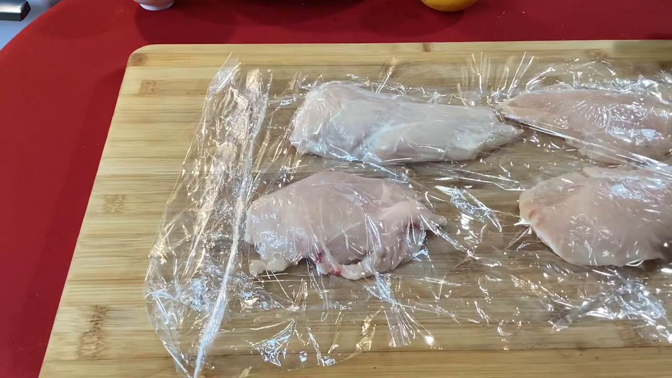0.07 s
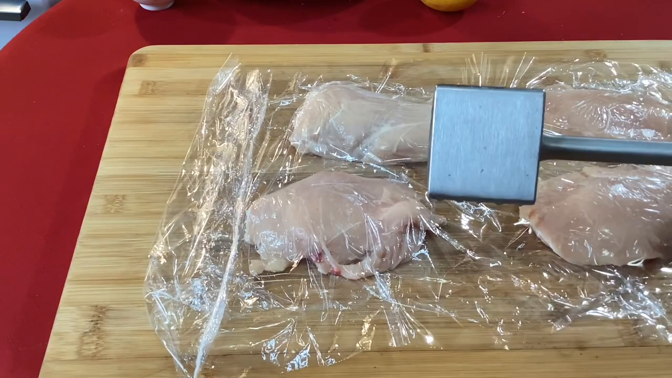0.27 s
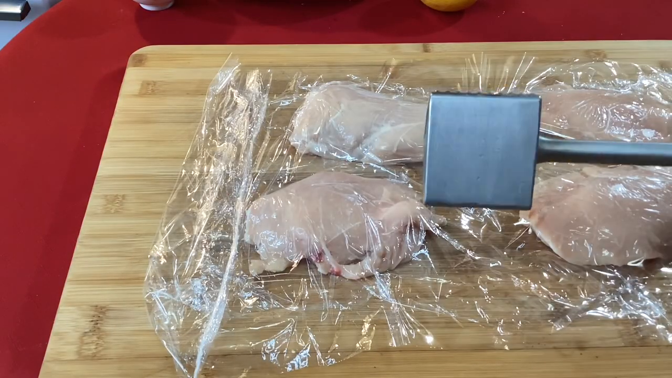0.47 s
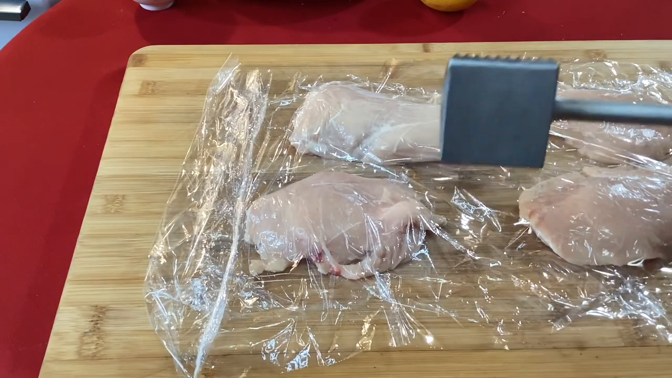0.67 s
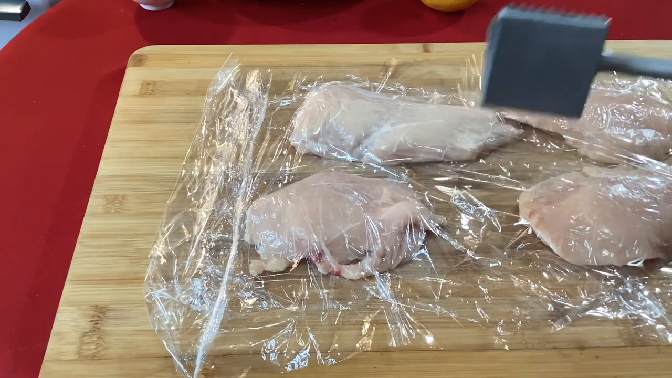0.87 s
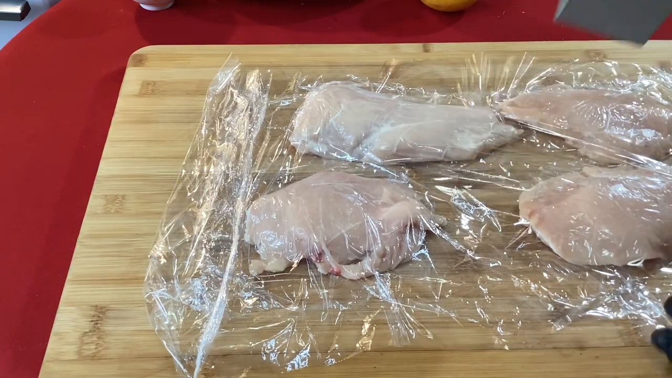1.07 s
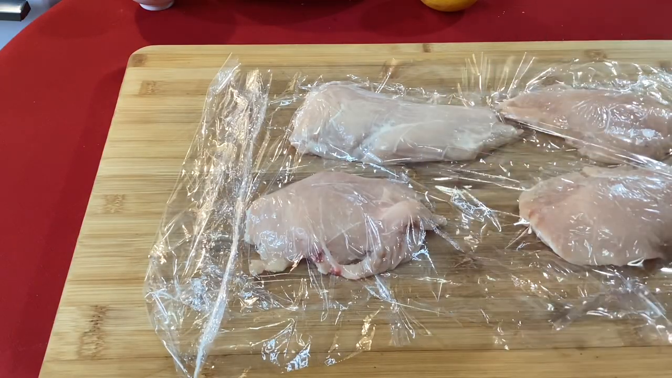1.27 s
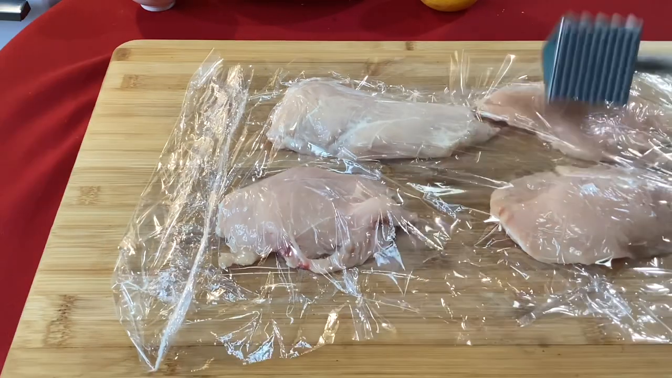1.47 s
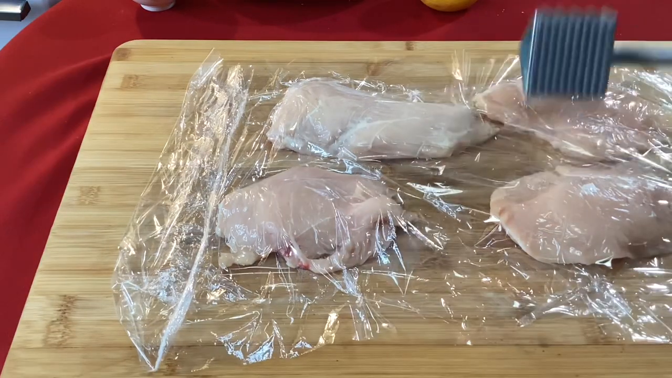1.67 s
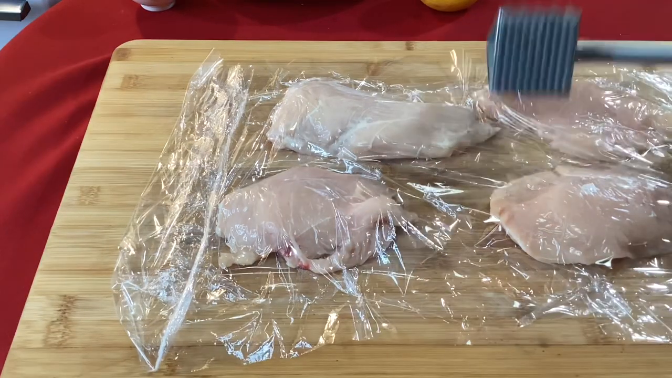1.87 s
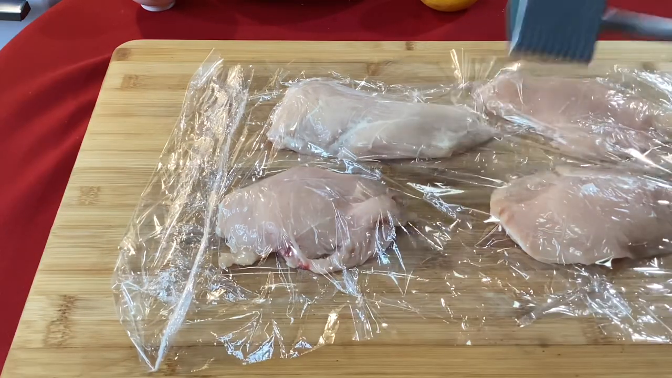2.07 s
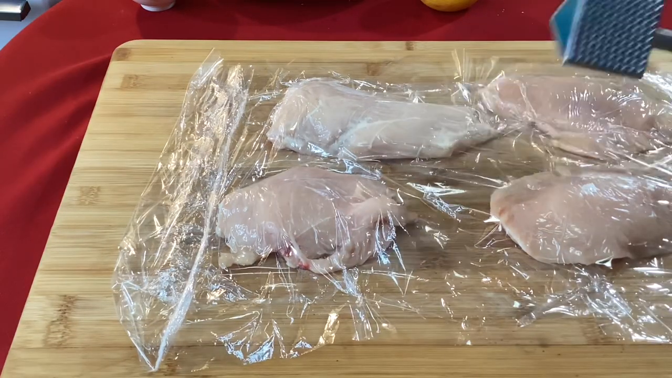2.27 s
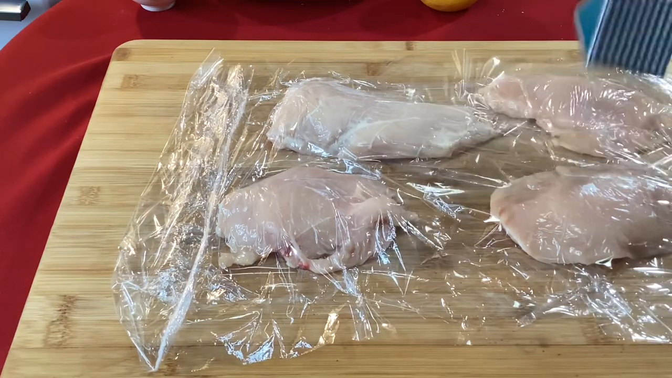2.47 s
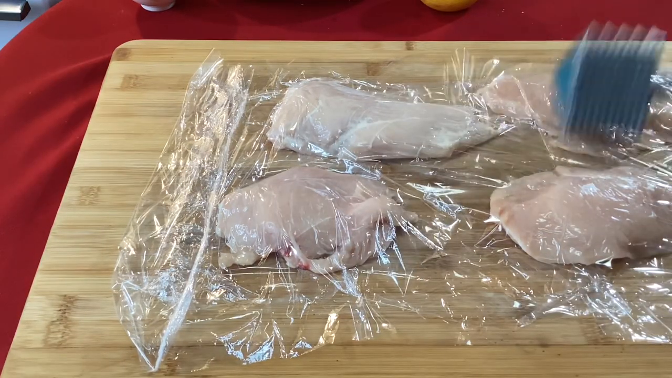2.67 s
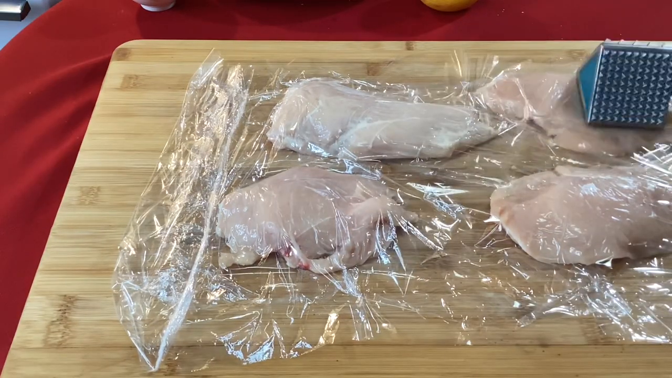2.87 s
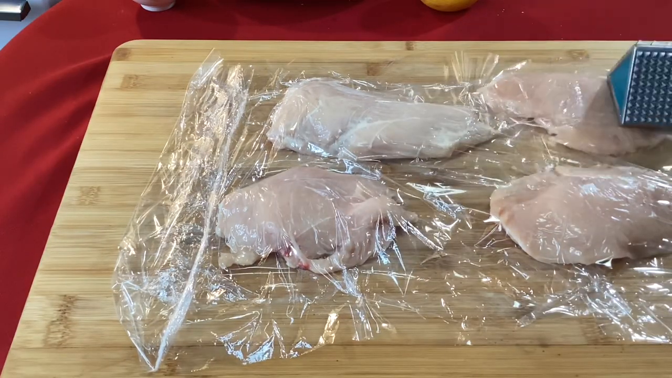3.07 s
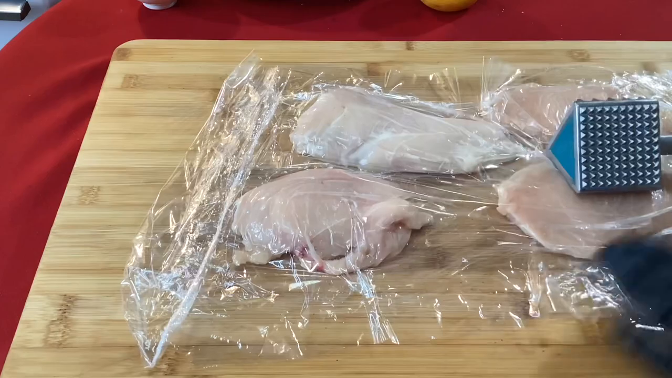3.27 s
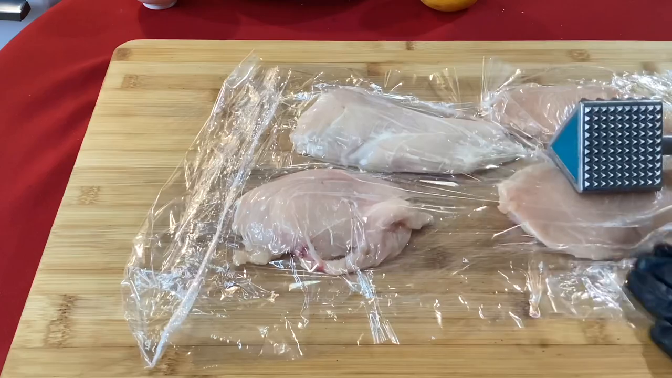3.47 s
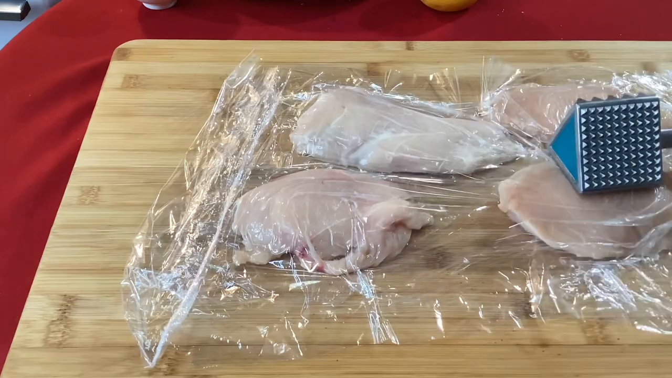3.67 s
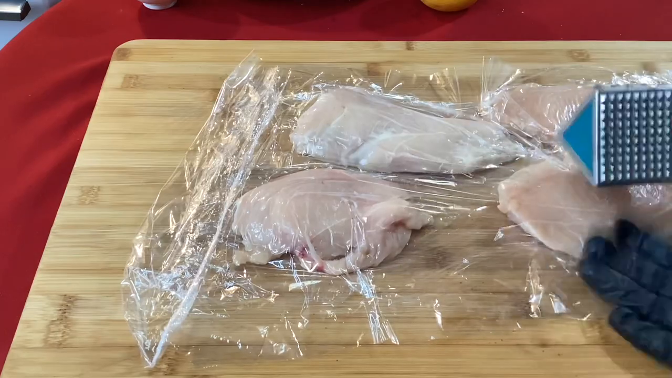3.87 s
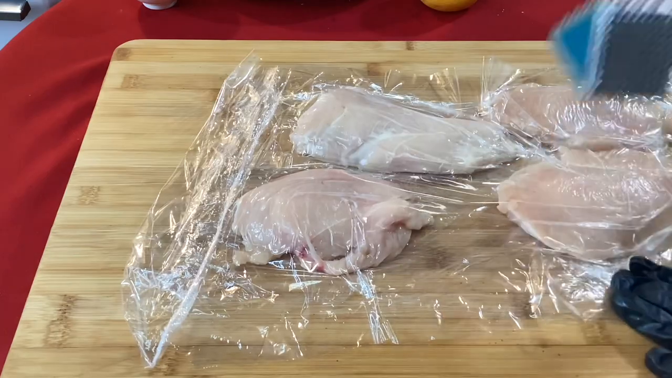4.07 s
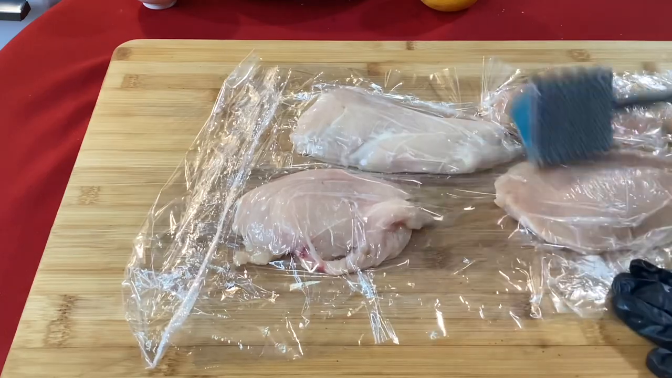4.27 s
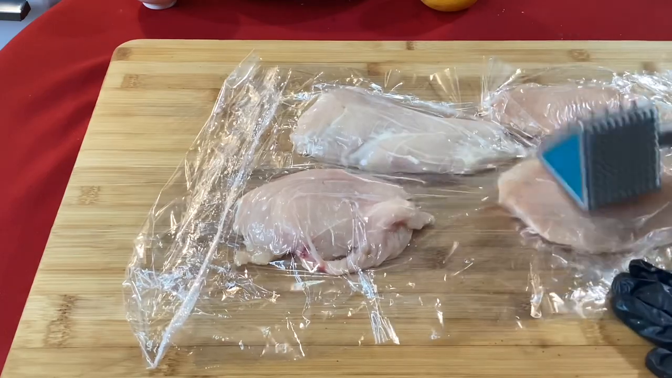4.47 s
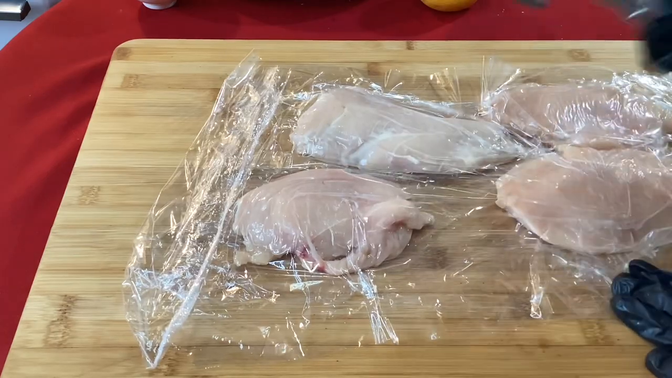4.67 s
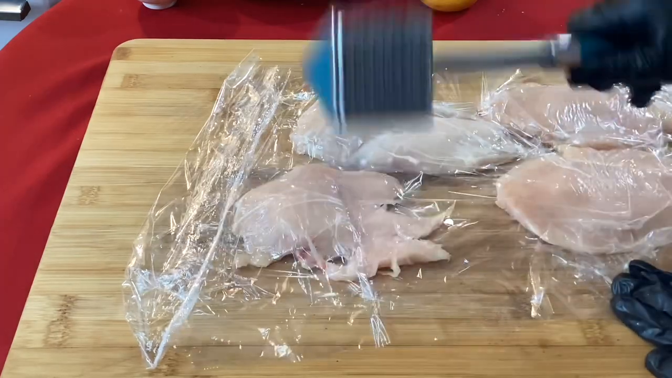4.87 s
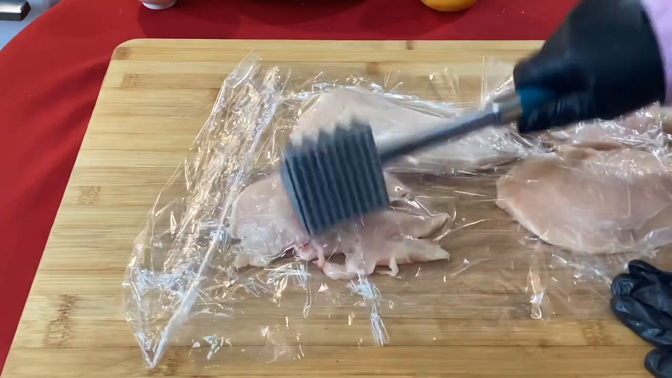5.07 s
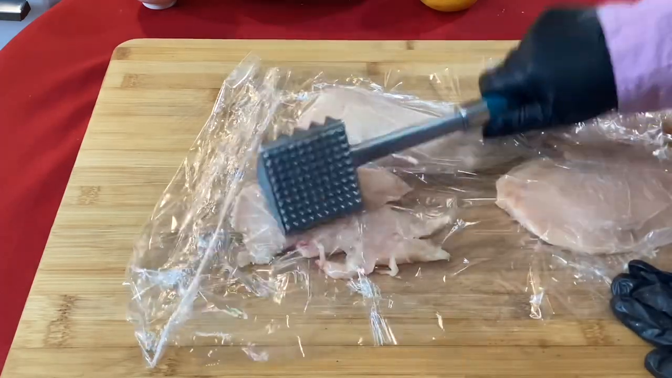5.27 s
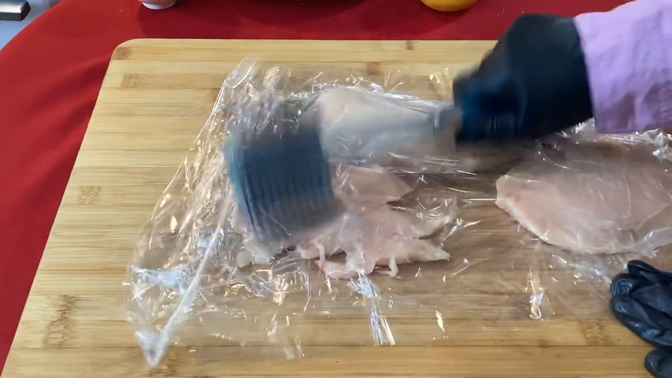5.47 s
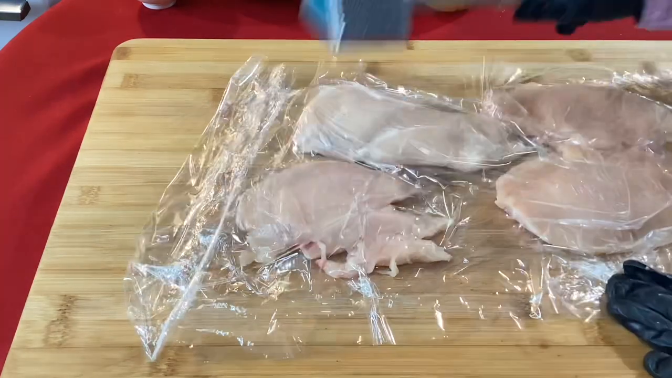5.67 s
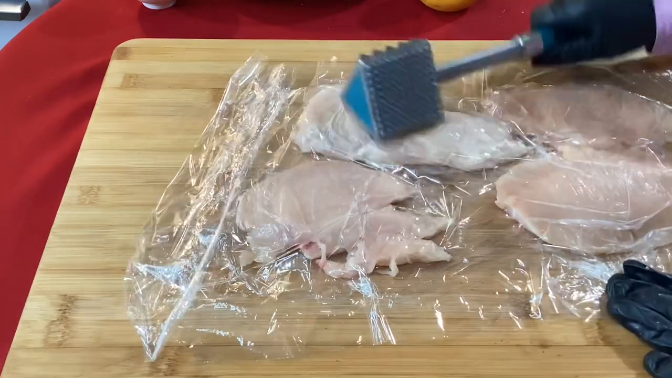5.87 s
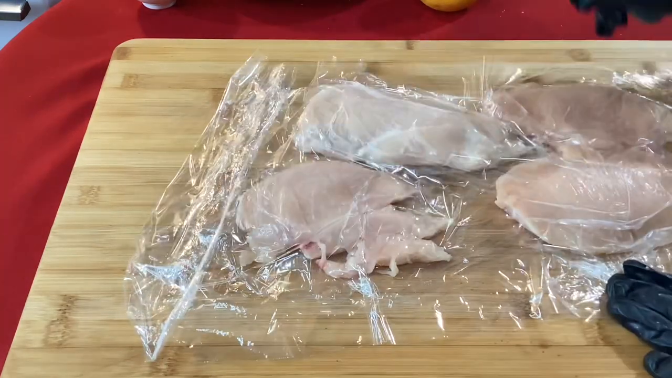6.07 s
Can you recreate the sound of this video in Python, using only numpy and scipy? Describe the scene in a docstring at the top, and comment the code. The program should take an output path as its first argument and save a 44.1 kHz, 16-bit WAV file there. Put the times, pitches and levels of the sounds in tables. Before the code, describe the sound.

Close up in a small kitchen, over a very faint low motor hum and microphone hiss. A tiny plastic crackle at the start gives way to near quiet, with a thin hiss and light rustling from about 0.6 s. At 1.4 s a mallet begins pounding meat through plastic wrap, ten blows about 0.18 s apart until 3.1 s, the early ones softer, the later ones brighter and harder. Each swells from crackle to a slap, with a short wooden knock and crinkly tail. From 3.2 to 3.85 s wrap and gloves rustle, then a very faint double touch near 3.9 s. Heavier, deeper blows land at 4.2, 4.5, 4.75, 5.0, 5.25 and 5.5 s, jolting a dish into faint clinks. After a brief dip at 5.7 s, a last slap at 5.83 s carries a sharp plastic snap; its tail fades into faint crackle by 6.1 s.

```python
"""A metal mallet pounds meat through plastic wrap on a wooden board in a small kitchen.
Each blow is noise crackling up to a slap with a noisy tail, over the ringing modes of the board.
A dish nearby sometimes clinks as a few decaying sines; wrap and gloves rustle as banded crackle, which
at the very end is the next blow beginning to swell. Behind lie the low overtones of a distant motor,
a narrow hiss that comes and goes and faint microphone hiss; the level dips briefly four times."""
import sys
import numpy as np
from scipy import signal
from scipy.fft import rfft, irfft, next_fast_len
from scipy.io import wavfile

SR = 44100
rng = np.random.default_rng(int(sys.argv[2]) if len(sys.argv) > 2 else 0)


def materialize(psi):
    """Save the field psi as 16-bit PCM at rate SR to the path in sys.argv[1].

    A 1-D psi becomes a single channel; in a 2-D psi each row is a channel.
    """
    bounded = np.clip(np.atleast_2d(psi).T, -1, 1)
    quanta = np.round(bounded * 32767).astype(np.int16)
    wavfile.write(sys.argv[1], SR, quanta)


def amplitude_ratio(level_db):
    """Convert a level in decibels to the matching linear amplitude (field) ratio."""
    exponent = np.asarray(level_db, float) / 20
    return 10 ** exponent


N = 270333
T = np.arange(N) / SR

# mallet on wrap: peak t/s, level/dB, tilt/dB per octave, air pocket f/Hz, its lift/dB,
# tail level relative to the slap/dB
MALLET_BLOWS = [(1.442, -43, 1, 1840, 5.5, -5), (1.629, -41.5, 2, 1400, 1.5, -5),
                (1.816, -43, 1.4, 1120, 6, -4), (1.998, -36.5, -0.4, 3600, 6.5, -7.5),
                (2.174, -34.5, -0.7, 3920, 14.5, -8), (2.343, -37, 0.5, 1380, 5, -8),
                (2.519, -31, -2, 2980, 9, -3), (2.694, -39, 0.4, 2920, 8.5, -4),
                (2.879, -33.5, 2.5, 4900, 9.5, -6), (3.059, -36, 0.4, 5750, 4.5, -9.5),
                (3.886, -51.5, 0.7, 4370, 7.5, -7.5), (3.923, -57.5, 0.5, 1320, 6, -1),
                (4.213, -33, 0.3, 3430, 3.5, -4), (4.474, -35.5, 2, 5200, -0.5, -5.5),
                (4.755, -34.5, -0.2, 4550, 8, -8), (5.013, -37, 0.3, 3580, 6.5, -7),
                (5.251, -33.5, -0.4, 1470, 1, -7), (5.489, -34, .5, 2380, 1.5, 0.6),
                (5.833, -37.5, -1.5, 1840, 9.5, 0.7)]
# board under each blow: t/s, level before the mode levels/dB, knock favoured by this spot f/Hz, its lift/dB
BOARD_BLOWS = [(1.445, -54.5, 456, 6), (1.628, -48, 740, 9), (1.821, -50.5, 750, 3.5),
               (2.001, -53.5, 320, 0.5), (2.171, -47, 790, 11.5), (2.346, -50.5, 604, 8),
               (2.525, -48.5, 1580, 15.5), (2.701, -47, 720, 7), (2.875, -50, 1310, 5),
               (3.067, -51.5, 748, 2), (3.895, -76, 500, 0), (3.931, -61.5, 404, 18),
               (4.219, -40.5, 384, 0.5), (4.48, -41, 560, 12.5), (4.762, -48.5, 326, 15.5),
               (5.021, -45.5, 318, 9), (5.258, -44.5, 750, -4.5), (5.492, -42.5, 320, 1.5),
               (5.844, -52, 745, 14.5)]


def on_log(hz, table, order=1):
    """Read a column of a table on a log-frequency axis."""
    rows = np.array(table, float)
    return np.interp(np.log(np.maximum(hz, 1)), np.log(rows[:, 0]), rows[:, order])


def shaped(x, db_at):
    """Filter x by a dB curve over Hz."""
    size = next_fast_len(len(x))
    gain = amplitude_ratio(db_at(np.fft.rfftfreq(size, 1 / SR)))
    return irfft(rfft(x, size) * gain, size)[:len(x)]


def unit(x):
    """Scale to rms 1."""
    return x / np.sqrt(np.mean(x ** 2))


def band(x, lo_hz, hi_hz):
    """Band-pass."""
    sos = signal.butter(3, [lo_hz, hi_hz], "band", fs=SR, output="sos")
    return signal.sosfilt(sos, x)


def add(out, s, x):
    """Mix x in from time s."""
    i = int(s * SR)
    out[i:i + len(x)] += x[:N - i]


def spot(s):
    """Swell time (ms) and tail t60 (s) of the spot pounded at time s."""
    # pounded spots: from t/s, time to swell 12 dB/ms, tail t60/s
    spots = [(1.4, 17, 0.26), (1.9, 15.5, 0.26), (3.0, 15, 0.36), (4.1, 14, .33), (5.7, 10, 0.46)]
    return [row for row in spots if row[0] <= s][-1][1:]


def crackle(size, spread_db, grain_ms):
    """Noise whose loudness jumps from one tiny fold to the next."""
    fold_size = max(int(grain_ms * SR / 1000), 1)
    fold_db = spread_db * rng.standard_normal(size // fold_size + 1)
    folds = np.repeat(amplitude_ratio(fold_db), fold_size)[:size]
    return unit(rng.standard_normal(size) * folds)


def coloured(size, table, humps, tilt_db, spread_db):
    """Crackle with the colour of a table, some (Hz, dB) humps and a tilt; rms 1 in the middle range."""
    # chance peaks and hollows of the crumpled sheet, new for each burst
    ripple_db, ripple_hz = 2.5, 221
    ripple = ripple_db * rng.standard_normal(128)

    def colour(f):
        """Level in dB at f Hz."""
        octaves = np.log2(np.maximum(f, 1) / 2500)
        lift = np.interp(f / ripple_hz, np.arange(len(ripple)), ripple)
        for hz, db in humps:
            away = octaves - np.log2(hz / 2500)
            lift = lift + db * np.exp(-0.5 * (away / 0.25) ** 2)
        return on_log(f, table) + lift + tilt_db * np.clip(octaves, -2.5, 2.5)

    grain = shaped(crackle(size, spread_db, 0.66), colour)
    return grain / np.std(band(grain, 970, 7150))


def slaps():
    """Crackle swells ever faster as the head sinks in and stops when the meat bottoms out."""
    # colour of the wrap: f/Hz, level per Hz/dB
    wrap_colour = [(180, -18.5), (300, -6.5), (1200, 0), (1440, -3), (2070, -2.5), (4570, -7), (5950, -2.5),
                   (6460, -5.5), (8560, -6), (15500, -8.5)]
    knock_share = 0.9  # the favoured knock also colours the slap
    hold_ms, fall_db_per_ms = 3.5, 1.6  # full level this long on either side of the peak
    out = np.zeros(N)
    ms = np.arange(-70, 50, 1000 / SR)
    for (s, db, tilt_db, hz, lift_db, _), (*_, knock_hz, knock_db) in zip(MALLET_BLOWS, BOARD_BLOWS):
        swell_ms = spot(s)[0]
        before = np.maximum(-ms - hold_ms, 0) / np.maximum(swell_ms - hold_ms, 1)
        rise = -12 * before ** 0.76
        fall = -fall_db_per_ms * np.maximum(ms - hold_ms, 0)
        humps = [(hz, lift_db), (knock_hz, knock_share * knock_db)]
        grain = coloured(len(ms), wrap_colour, humps, tilt_db, 1.4)
        add(out, s + ms[0] / 1000, grain * amplitude_ratio(db + rise + fall))
    return out


def settling():
    """A noisy tail after each slap keeps part of its colour; each band dies at its own rate."""
    # colour of the tail: f/Hz, level per Hz/dB, share of the spot's t60
    settle_colour = [(200, -6, 0.79), (500, -0.5, 1.04), (800, 1.5, 1.076), (2000, -1, 1.036),
                     (5200, -3.5, 0.95), (7040, 0, 0.66), (15900, -8.5, 0.9)]
    # what the tail keeps of the slap's colour
    tilt_share, tilt_offset_db, lift_share, knock_share = 0.89, -0.06, 0.61, 0.42
    out = np.zeros(N)
    t = T[:int(0.4 * SR)]
    edges = 110 * 2 ** np.arange(0, 7.5, 0.9)  # bands 0.9 octave wide
    for (s, db, tilt_db, hz, lift_db, tail_db), (*_, knock_hz, knock_db) in zip(MALLET_BLOWS, BOARD_BLOWS):
        humps = [(hz, lift_share * lift_db), (knock_hz, knock_share * knock_db)]
        tail_tilt_db = tilt_offset_db + tilt_share * tilt_db
        grain = coloured(len(t), settle_colour, humps, tail_tilt_db, 0.78)
        spot_t60 = spot(s)[1]
        tail = 0
        for lo, hi in zip(edges[:-1], edges[1:]):
            t60 = spot_t60 * on_log(lo, settle_colour, order=2)
            tail = tail + band(grain, lo, hi) * amplitude_ratio(-60 * t / t60)
        onset = 1 - np.exp(-t / 0.0064)
        add(out, s, amplitude_ratio(db + tail_db) * tail * onset)
    return out


def ring(hz, t60, swell_s):
    """One mode, pushed over swell_s and dying away."""
    t = T[:int(1.2 * t60 * SR)]
    push = 1 - np.exp(-(t / swell_s) ** 2)
    return np.sin(2 * np.pi * hz * t) * push * amplitude_ratio(-60 * t / t60)


def thuds():
    """The board's modes; the stiff high ones speak first, the deep flex comes last."""
    # board modes: f/Hz before a small chance detuning, level/dB, t60/s
    board_modes = [(66.5, 9, 0.031), (97, 13.5, 0.045), (108, -17, 0.1), (215, -8, 0.17), (297.3, -8, 0.21),
                   (319.6, 3.5, 0.11), (478.3, 9, 0.045), (670.3, 0, 0.065), (813.4, -2.5, 0.091)]
    # upper modes away from the favoured knock, and the reach of its lift
    knock_floor_db, knock_octaves = -2.5, 0.3
    out = np.zeros(N)
    detune = 0.012 * rng.standard_normal((len(BOARD_BLOWS), len(board_modes)))
    for (s, db, knock_hz, lift_db), shifts in zip(BOARD_BLOWS, detune):
        for (hz, mode_db, t60), shift in zip(board_modes, shifts):
            away = np.log2(hz / knock_hz) / knock_octaves
            knock_db = knock_floor_db + lift_db * np.exp(-0.5 * away ** 2)
            gain_db = db + mode_db + knock_db * (hz > 150)
            lead_s = 0.0014 + 0.002189 * np.log2(hz / 60)
            add(out, s - lead_s, -amplitude_ratio(gain_db) * ring(hz * (1 + shift), t60, 0.0031))
    return out


def snaps():
    """Single folds snap: brief bright noise bursts, broad around one pitch."""
    # snapping folds: t/s, level/dB, half length/ms, loudest f/Hz
    fold_snaps = [(.06, -56.5, 1.8, 8860), (3.582, -64, 5.8, 4470), (5.8309, -27.5, 0.73, 5900)]
    spread = 1.7  # frequency ratio from the loudest pitch to either band edge
    out = np.zeros(N)
    ms = np.arange(-25, 25, 1000 / SR)
    for s, db, half_ms, hz in fold_snaps:
        noise = rng.standard_normal(len(ms))
        burst = unit(band(noise, hz / spread, min(hz * spread, 15500)))
        add(out, s + ms[0] / 1000, amplitude_ratio(db) * burst * np.exp(-0.5 * (ms / half_ms) ** 2))
    return out


def rustle():
    """Crackle in three ranges: wrap and gloves move, and in the last list the next blow begins to swell."""
    # stretches of crackle, the last one the start of the next blow's swell:
    # t/s, level/dB, treble relative to it/dB, low part relative to it/dB
    stretches = [
        [(0.01, -67, -1.5, -26), (0.068, -77, 8, -11), (0.14, -82, -3, -13)],
        [(0.52, -100, -1, 0), (0.632, -87.5, -12, -10), (0.77, -87.5, -7, 0), (0.804, -74, 1.5, -8),
         (0.88, -77.5, -12, -1), (1.01, -90, -4, -11), (1.09, -85.5, -7, -18), (1.174, -77.5, 9, -33),
         (1.22, -74.5, 0, -9), (1.292, -74, 4.5, -23), (1.362, -67, -7, -2)],
        [(3.21, -73, 2, .3), (3.23, -66, -2.5, -1), (3.326, -82, -6, -5), (3.35, -61.5, 2, -9),
         (3.402, -77.5, 2, -9), (3.428, -73, -0.5, -23.5), (3.638, -72, 3, -32), (3.72, -68, 5.5, -14),
         (3.776, -83.5, 1.5, -35), (3.83, -94.5, -7, -28)],
        [(4.0, -80.5, 6, -8), (4.096, -78, -2, -21), (4.14, -87.5, 3, -24)],
        [(5.71, -76, 3, 0), (5.738, -69.5, -20, 2), (5.77, -78, -7, -2), (5.8, -71, 1.5, -10)],
        [(6.1, -88, -8, 4), (6.116, -75.5, 3, 1), (6.13, -77, 8, 1.5)],
    ]
    grain = crackle(N, 1.3, 2.0)
    middle = unit(band(grain, 1430, 6600))
    treble = unit(band(grain, 6360, 13500))
    low = unit(band(grain, 337, 1250))
    out = np.zeros(N)
    for rows in stretches:
        s, db, treble_db, low_db = np.transpose(rows)
        level = np.interp(T, [s[0] - 0.03, *s, s[-1] + 0.043], [-110, *db, -110])
        out += amplitude_ratio(level) * middle
        out += amplitude_ratio(level + np.interp(T, s, treble_db)) * treble
        out += amplitude_ratio(level + np.interp(T, s, low_db)) * low
    return out


def dish():
    """A dish jolted on the table: short taps ring the same few modes."""
    # taps: t/s, low ring level before the mode levels/dB, high ping level likewise/dB
    jolts = [(4.244, -58, -44.5), (4.306, -66.5, -74), (4.497, -63, -49.5), (4.769, -62, -66),
             (4.815, -61.5, -60), (5.077, -59, -52), (5.096, -64, -62), (5.27, -66, -64), (5.325, -65, -59),
             (5.509, -57, -58)]
    # dish modes, some in close pairs: f/Hz, level/dB, t60/s
    dish_modes = [(1128, -4, .5), (1143, -8, .45), (1763, -6, .45), (1776, -3, .42), (2514, -12, .3),
                  (2762, 3, .15)]
    out = np.zeros(N)
    for s, low_db, high_db in jolts:
        for hz, mode_db, t60 in dish_modes:
            tap_db = low_db if hz < 2000 else high_db
            add(out, s, amplitude_ratio(mode_db + tap_db) * ring(hz, t60, 0.00049))
    return out


def kitchen(x):
    """Diffuse echo: half-octave bands of noise, each dying at its own rate."""
    # room: f/Hz, t60/s, level/dB
    room_decay = [(101.5, 0.2, 5), (300, 0.23, 1), (1000, 0.61, -18), (3030, 0.27, 2.5)]
    t = T[:int(0.45 * SR)]
    noise = rng.standard_normal(len(t))
    edges = 45 * 2 ** np.arange(0, 9, 0.5)
    tail = 0
    for lo, hi in zip(edges[:-1], edges[1:]):
        level_db = on_log(lo, room_decay, order=2) - 60 * t / on_log(lo, room_decay)
        tail = tail + band(noise, lo, hi) * amplitude_ratio(level_db)
    tail = tail * (1 - np.exp(-t / 0.0041))
    return signal.fftconvolve(x, tail / np.sqrt(np.sum(tail ** 2)))[:N]


def hiss():
    """A faint narrow noise near 2.4 kHz comes and goes."""
    # hiss: t/s, level/dB
    hiss_level = [(.5, -110), (.65, -93), (.85, -84), (1.05, -87), (1.12, -98), (1.3, -88), (1.37, -110)]
    noise = unit(band(rng.standard_normal(N), 2250, 2600))
    return noise * amplitude_ratio(np.interp(T, *np.transpose(hiss_level)))


def hum():
    """Distant motor, one soft throb a turn: overtones nearly in step waver alone over a like-coloured rumble."""
    # what the walls let through: f/Hz, level/dB
    wall_colour = [(40, -31.5), (69, -11), (92, -2), (115, 0), (138, -7.5), (161, -10), (182, -1),
                   (207, -14.5), (231, -6.5), (255, -19.5), (310, -17.5), (400, -24), (600, -35)]
    # tones of the hum over time: t/s, level/dB
    hum_level = [(0, -69), (1.3, -69.5), (1.45, -70), (3.2, -69), (3.5, -77), (4.1, -75), (4.3, -66.5),
                 (5.6, -75), (5.75, -74), (6.13, -75)]
    # motor: t/s, speed/turns per s
    motor_speed = [(0, 24.0), (.15, 24.0), (.2, 22.8), (.32, 22.5), (.55, 23.2), (1.0, 23.2), (1.2, 22.1),
                   (1.37, 22.3), (3.3, 29.2), (3.75, 29.0), (4.1, 32.0), (6.13, 29.0)]
    waver_db, slip_rad, waver_s = 3.0, 0.7, 0.2
    rumble_db = -5  # relative to the tones
    turns = np.interp(T, *np.transpose(motor_speed))
    phase = 2 * np.pi * (np.cumsum(turns) / SR - 0.1)
    knots = np.arange(0, N / SR + 1, waver_s)
    waver, slip = rng.standard_normal((2, 14, len(knots)))
    tones = np.zeros(N)
    for k in range(2, 14):
        level_db = on_log(k * turns, wall_colour) + waver_db * np.interp(T, knots, waver[k])
        tones += amplitude_ratio(level_db) * np.cos(k * phase + slip_rad * np.interp(T, knots, slip[k]))
    rumble = shaped(rng.standard_normal(N), lambda f: on_log(f, wall_colour) - 60 * (f > 900))
    mix = unit(tones) + amplitude_ratio(rumble_db) * unit(rumble)
    return mix * amplitude_ratio(np.interp(T, *np.transpose(hum_level)))


def mic_hiss():
    """Faint steady hiss of the microphone."""
    return amplitude_ratio(-96.5) * unit(band(rng.standard_normal(N), 900, 10500))


def dips():
    """Gain that falls briefly and returns, its depth in dB shrinking exponentially on either side."""
    # dips: deepest t/s, fall time constant/ms, return time constant/ms, depth level/dB
    brief_dips = [(.17, 10, 14, -27), (1.374, 4.1, 8.7, -34), (3.203, 29, 8.4, -19), (5.703, 7.8, 14, -12)]
    db = np.zeros(N)
    for s, out_ms, in_ms, depth_db in brief_dips:
        away = np.where(T < s, (T - s) / out_ms, (s - T) / in_ms) * 1000
        db += depth_db * np.exp(away)
    return amplitude_ratio(db)


def scene():
    """All sources with the room's echo of board and dish, under the dips."""
    board, clinks = thuds(), dish()
    echo = kitchen(amplitude_ratio(-6) * board + amplitude_ratio(-10) * clinks)
    wrap = slaps() + settling() + snaps() + rustle()
    background = hiss() + hum() + mic_hiss()
    mix = wrap + board + clinks + echo + background
    return (mix * dips())[None]


def low_pass(x):
    """Removes everything above the highest recorded frequency."""
    return signal.sosfilt(signal.butter(12, 15970, fs=SR, output="sos"), x)


def record(dry):
    """The microphone path drops by a step above 6 kHz, rolls off at the very top and loses the deep bass."""
    def treble_db(f):
        """Level in dB at f Hz: a 5 dB step, then a slope per kHz."""
        step = -5.0 / (1 + np.exp(np.clip((6150 - f) / 30, -50, 50)))
        return step - 3.6 * np.maximum(f - 13500, 0) / 1000

    bass_cut = signal.butter(4, 50, "high", fs=SR, output="sos")
    x = signal.sosfilt(bass_cut, shaped(dry[0], treble_db))
    return low_pass(x[None])


dry = scene()
out = record(dry)
materialize(out)
```